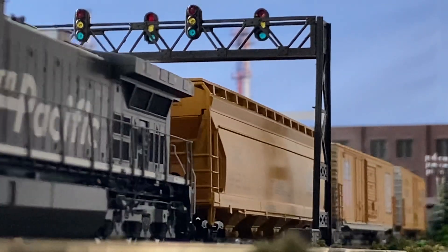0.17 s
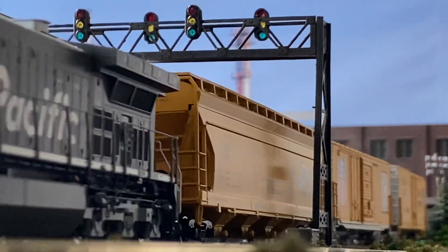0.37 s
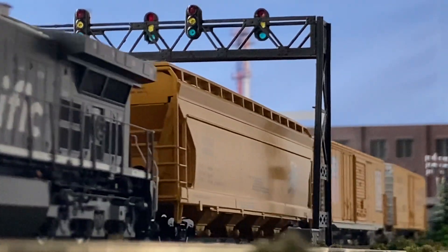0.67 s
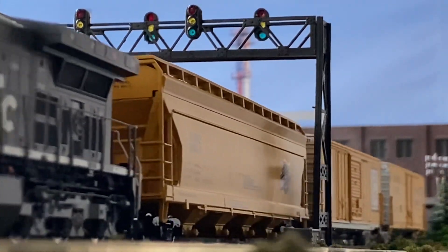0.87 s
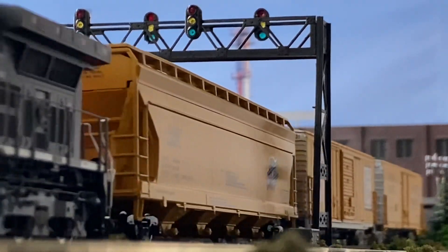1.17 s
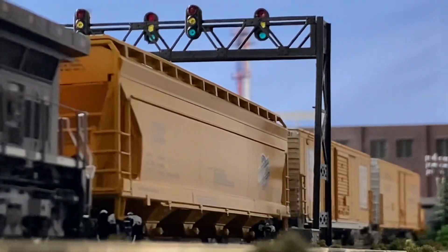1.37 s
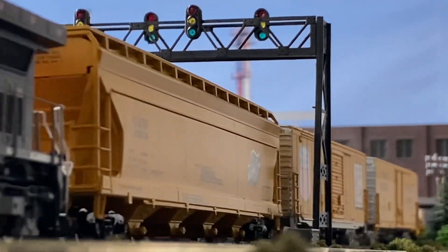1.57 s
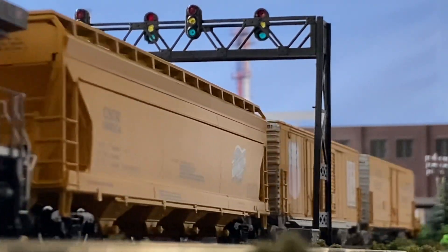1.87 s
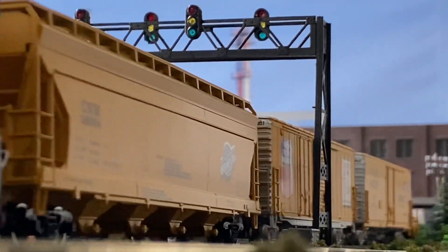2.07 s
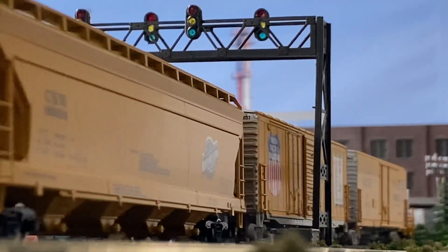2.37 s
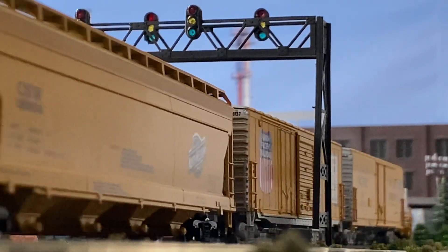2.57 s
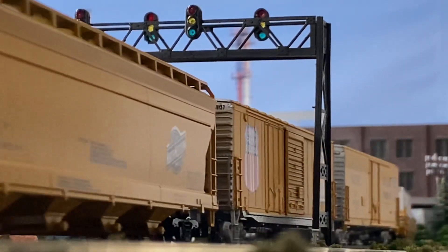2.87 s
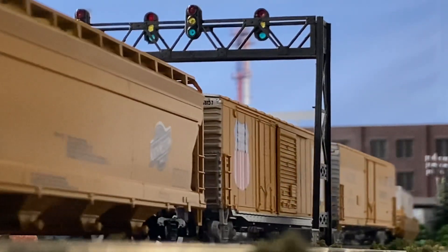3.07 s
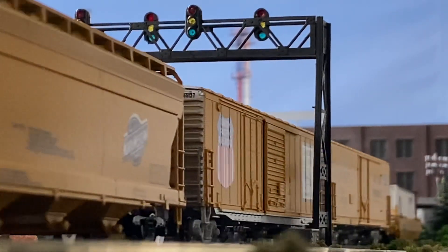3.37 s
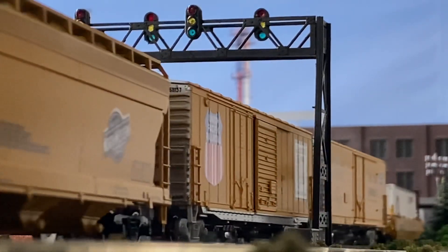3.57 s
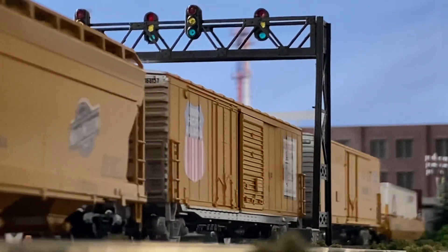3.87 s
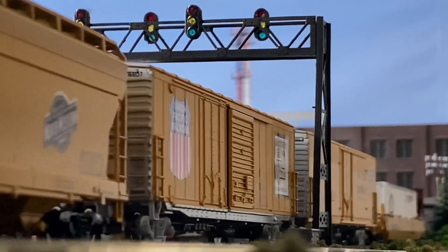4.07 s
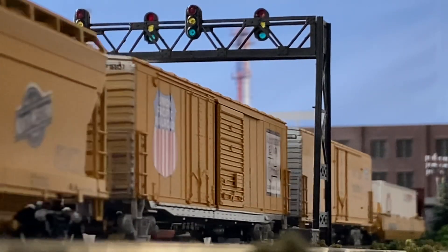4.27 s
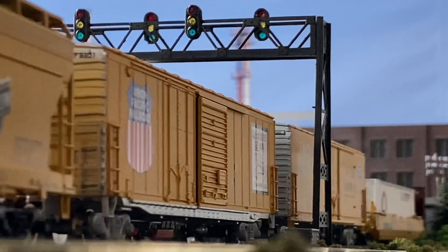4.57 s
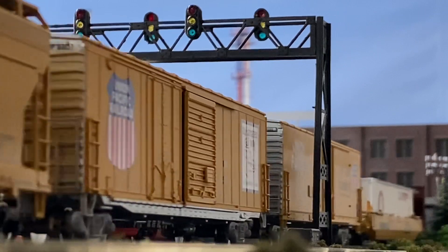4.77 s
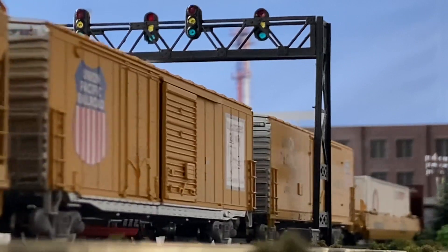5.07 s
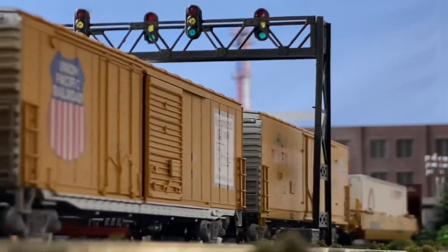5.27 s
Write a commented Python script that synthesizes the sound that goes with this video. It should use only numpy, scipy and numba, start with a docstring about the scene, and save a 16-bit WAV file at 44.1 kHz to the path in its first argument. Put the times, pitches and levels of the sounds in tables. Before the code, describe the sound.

A model freight train creeps past, heard from close beside the track. From the start, tiny wheels make a continuous, thin metallic scrape that pulses unevenly about seven times a second. The locomotive's small motor and gears drone and whirr through the baseboard, left of centre. At about 1.1 seconds a thin, high ringing tone rises from the rail, and light, sharp wheel ticks begin, coming irregularly and more often after 2 seconds. The motor drone is fullest around 2 seconds, then slowly recedes to the left. A faint low growl enters at 1.5 seconds, and a faint deeper rumble at 3 seconds. The scrape grows louder and hissier from about 3 seconds, shifting in tone as the cars move, and is strongest until about 4.7, with the clearest ticks near 4 and 4.8 seconds. It eases slightly but is still rolling at the end, around 5.4 seconds.

```python
"""Beside a model railway track, a small freight train creeps past a phone. A tiny wheel scrapes
the rail unevenly, easing off once a turn, and rings rail and car body; sharper nicks tick, the rail
sings thinly, and the colour of the scrape shifts as the cars move. On the left the locomotive's
motor and gears drone through the baseboard, over a low growl and rumble."""
import sys
import numpy as np
from scipy import signal
from scipy.fft import rfft, irfft, next_fast_len
from scipy.io import wavfile
from scipy.ndimage import uniform_filter1d
from numba import njit

SR = 44100
rng = np.random.default_rng(int(sys.argv[2]) if len(sys.argv) > 2 else 0)


def to_wav(sig):
    """Store sig (one row per channel, or 1-D mono) as 16-bit WAV at the path in sys.argv[1].

    Samples outside -1..1 are clipped; the rate is SR.
    """
    pcm = np.clip(np.atleast_2d(sig), -1, 1) * 32767
    pcm = np.round(pcm).astype(np.int16)
    wavfile.write(sys.argv[1], SR, pcm.T)  # frames by channels


N = 239771
T = np.arange(N) / SR

# time_s, lateness_s
TURN_LAG = [(0, 0.0014), (.9, -.004), (1.05, .003), (1.55, -0.0011), (2.1, 0.0015), (2.42, 0.012), (2.8, 0),
            (3.2, -.007), (3.6, -0.011), (3.78, -0.0000075), (4.1, -.007), (4.45, -0.0013), (4.85, -0.002),
            (5.3, 0.011), (5.44, 0.0043)]
# turn_fraction, pressure_db
TURN_PRESSURE = [(0, 4), (.07, 0), (.17, 5), (.33, 4.5), (.45, 2), (.6, 2), (.68, -1.5), (.74, -6),
                 (.8, -1), (.88, 3), (1, 4.5)]
# centre_s, half_length_s, gain_db
PRESSURE_SURGES = [(.94, 0.01, 2.5), (1.115, 0.009, 1.5), (1.41, 0.015, 3.5), (1.535, 0.012, 2),
                   (1.575, .006, 3), (1.62, 0.014, 2.5), (2.36, 0.015, 2), (2.48, 0.032, 2),
                   (2.77, 0.018, 1.5), (2.87, 0.037, 1), (3.02, 0.015, 1.5), (3.29, 0.025, 1.5),
                   (3.69, 0.017, 0.5), (3.965, 0.015, 2.5), (4.25, 0.015, 3), (4.36, 0.03, 2),
                   (4.47, .015, 1.5), (4.64, 0.033, 1.5), (4.77, 0.012, -0.5), (5.2, .02, 1.5),
                   (5.32, 0.019, 2)]
def wheel_scrape(turn_hz=7.378):
    """Wheel pressure on the rail cycles each turn and surges briefly; the train's speed wavers."""
    turn_fraction = (T - curve(TURN_LAG)) * turn_hz % 1
    pressure_db = np.interp(turn_fraction, *np.transpose(TURN_PRESSURE)) + 0.9 * walk(110)
    body = gliding_notches(body_rings(pressure_db))
    friction = rng.standard_normal(N) * undb(0.38 * pressure_db)
    return undb(swell(PRESSURE_SURGES)) * (body + rail_tone(pressure_db) + narrow_rings(friction))


# per band (main, low shoulder, high shoulder, valley, hiss, upper hiss, air):
# base_hz, nominal_width_hz, relative_db
BAND_MODES = [
    [(3000, 245, 6.5), (3263, 290, 0)],
    [(2632, 354, 5), (2150, 720, -5.5), (1752, 290, -4.5)],
    [(3590, 350, 7.5), (4146, 344, 0)],
    [(4835, 940, 0)],
    [(6490, 790, 0)],
    [(7930, 1020, -8), (9050, 1110, -14.5)],
    [(10800, 3600, 0), (15100, 1100, -0.5)],
]
# per band: pressure_db_per_db
BAND_FOLLOW = [0.5, 0.45, 0.6, 0.53, 0.87, 0.84, 0.9]
# time_s, level_db
MAIN_BAND_LEVEL = [(0, -37.5), (.45, -35), (.6, -37), (.91, -35), (.95, -33.5), (1.08, -32), (1.13, -31.5),
                   (1.7, -30.3), (2.1, -30.5), (2.35, -27), (2.6, -30), (2.9, -24.5), (3.3, -23.5),
                   (3.7, -24.5), (4.35, -23), (4.65, -24), (5.1, -28), (5.44, -29)]
# per band after main: base_db
SIDE_BAND_DB = [-37, -39, -43, -35.5, -40, -74.5]
# per band after main: centre_s, half_length_s, gain_db; the top band brightens briefly and faintly at 1.6 s
SIDE_BAND_SWELLS = [
    [(.2, 0.34, 0), (.95, 0.27, -2.5), (2.85, 0.13, 1.5), (3.7, 1.44, 7.5)],
    [(.8, 0.7, 1.5), (2.85, 0.2, 3.5), (4.4, 1, 11)],
    [(.3, 0.31, 2.5), (2.4, 1, 3.5), (4.4, 0.54, -7)],
    [(1.5, 0.65, 4.5), (3.0, 1, 4), (4.8, 0.88, -6.5)],
    [(.3, 1.3, 7.5), (2.9, 0.35, 3.5), (4.25, 0.75, 9.5)],
    [(1.6, 0.23, 12), (3.7, 1.9, 30.5)],
]
def body_rings(pressure_db, scatter_db=1.3):
    """Dense tiny catches of uneven size ring rail and car body."""
    catches = (rng.random(N) < .3) * undb(scatter_db * rng.exponential(size=N))
    levels_db = [curve(MAIN_BAND_LEVEL)]
    levels_db += [db + swell(rows) for db, rows in zip(SIDE_BAND_DB, SIDE_BAND_SWELLS)]
    main_ratio = glide(1.07, 1.01, .6, .4)
    hiss_ratio = glide(1.02, 1.13, 3.2, .6) + glide(0, -.1, 4.5, .4)  # sinks as the wheel leaves
    pitch_ratios = [main_ratio, 1, 1, 1, hiss_ratio, 1, 1]
    out = 0
    for modes, db, follow, ratio in zip(BAND_MODES, levels_db, BAND_FOLLOW, pitch_ratios):
        band = ring_set(catches * rng.standard_normal(N), modes, ratio)
        load = undb(follow * pressure_db + 0.9 * walk(60))
        out = out + undb(db) * unit(load * band)
    return out


# from_hz, to_hz, centre_s, half_length_s
NOTCH_GLIDES = [(3780, 1690, 0.95, 0.71), (4730, 5330, 4.3, 0.58), (7190, 9400, 3.1, 1.8)]
# width_hz, depth_fraction
NOTCH_SHAPES = [(800, .62), (330, .88), (450, .65)]
def gliding_notches(x):
    """Dark gaps glide through the scrape as the cars move."""
    for path, (width_hz, depth) in zip(NOTCH_GLIDES, NOTCH_SHAPES):
        x = x - depth * ring(x, glide(*path), width_hz)
    return x


# pitch_hz, width_hz, level_db, centre_s, half_length_s
NARROW_MODES = [(3137, 45, -37.5, 0.19, 0.45), (3950, 130, -42, .9, 0.53), (3790, 96, -37.5, 2.65, .35),
                (4390, 10, -49.5, 4.8, 4), (2621, 50, -44, 3.2, 1.5), (6340, 170, -42, 3.3, 0.63)]
def narrow_rings(friction):
    """Narrow modes of rail and car, each heard while its wheel is near."""
    return sum(undb(db) * bell(centre_s, half_s) * unit(ring(friction, hz, width_hz))
               for hz, width_hz, db, centre_s, half_s in NARROW_MODES)


# pitch_hz, wander_hz, relative_db, left_db
RAIL_TONE = [(2984, 3.5, 0, 0)]
# time_s, base_db
RAIL_TONE_LEVEL = [(0, -62), (1.0, -58), (1.15, -38), (1.9, -37), (2.2, -41), (2.5, -38), (3.2, -40),
                   (3.5, -33), (4.4, -31), (4.8, -35), (5.44, -39)]
def rail_tone(pressure_db):
    """The rail sings one thin tone, louder under pressure."""
    return undb(curve(RAIL_TONE_LEVEL) + 0.4 * pressure_db) * tones(RAIL_TONE, waver_db=2.5)[0]


# start_s, peak_db
WHEEL_NICKS = [(1.112, -16.5), (1.7619, -15), (1.9275, -15.5), (2.162, -15), (2.3058, -18), (2.364, -14.5),
               (2.7128, -13), (2.9237, -16), (3.0006, -17), (3.1422, -15), (3.2343, -15), (3.2743, -12),
               (3.2987, -13), (3.5446, -13), (3.84, -12), (3.9555, -7), (4.148, -10), (4.3366, -15),
               (4.6072, -12), (4.7703, -9.5), (4.9611, -16), (5.001, -15), (5.1094, -18), (5.1483, -16),
               (5.2073, -15), (5.2346, -15), (5.322, -16), (5.4078, -18)]
def wheel_nicks(pitch_hz=3039.3, nominal_width_hz=270):
    """Single larger catches, each ringing briefly."""
    impulses = np.zeros(N)
    for start_s, peak_db in WHEEL_NICKS:
        impulses[int(start_s * SR)] = undb(peak_db)
    ticks = ring_set(impulses, [(pitch_hz, nominal_width_hz, 0)])
    return ticks * impulses.max() / np.abs(ticks).max()


# freq_hz, relative_db
BOARD_SPECTRUM = [(250, -39.5), (340, -14), (400, -7), (470, -12), (515, -5.5), (760, -1.5), (1050, 0.5),
                  (1260, -4.5), (1400, -25), (1700, -34)]
# pitch_hz, wander_hz, relative_db, left_db
DRONE_TONES = [(771, 7.96, -14.5, -0.5), (956, 3, -15, 5), (1048, 9.08, -17.5, 5.5), (1075, 5.93, -16, 4)]
def baseboard_drone(gain_db=-33.5, nearest_s=1.9, passing_s=2.35):
    """Motor and gears shake the board; the drone fills in, then spreads and draws off to the left."""
    nearness = 1 / np.hypot(1, (T - nearest_s) / passing_s)
    coherence = glide(0.85, -0.15, 3.5, 1.5)
    low_cut = glide(0.37, 0, 2, 0.5)
    noise = coloured(BOARD_SPECTRUM, coherence)
    board = np.array([side - low_cut * ring(side, hz=530, width_hz=360) for side in noise])
    drone = board + tones(DRONE_TONES) * [np.ones(N), coherence]
    return undb(gain_db) * nearness * panned(drone, glide(2.4, 7.6, 1.5, 1.1))


# freq_hz, relative_db
WHIRR_SPECTRUM = [(1100, -24.5), (1330, 4), (1560, 7), (1700, 1), (2000, 0.5), (2200, -20), (2600, -50)]
# pitch_hz, wander_hz, relative_db, left_db
GEAR_WHINES = [(1230.5, 2, -3.5, 6.5), (1412, 3, -18, 12), (1536, 2, -11.5, 8), (1558, 2, -13, 8)]
# pitch_hz, wander_hz, relative_db, left_db
ANTIPHASE_WHINE = [(1466, 1.5, -13, 6)]
def gear_whirr(gain_db=-41, fade_db_per_s=1.25):
    """Gears whirr and whine, slowly fading; one whine reaches left and right in opposite phase."""
    whirr = panned(coloured(WHIRR_SPECTRUM, coherence=0.25), left_db=1)
    whirr += tones(GEAR_WHINES, waver_db=3.0)
    whirr += tones(ANTIPHASE_WHINE, waver_db=1.5) * [[1], [-1]]
    return undb(gain_db - fade_db_per_s * T) * whirr


# pitch_hz, wander_hz, relative_db, left_db
HUM_TONES = [(384.7, 1.21, 1, 5.5), (346, 4.8, -13, -2)]
def motor_hum(gain_db=-53.5):
    """Two low motor and gear tones that swell twice."""
    swell_db = 4.1 * bell(.9, 0.25) + 5.9 * bell(2.9, 1.16)
    return undb(gain_db + swell_db) * tones(HUM_TONES, waver_db=-0.7)


# freq_hz, relative_db
GROWL_SPECTRUM = [(110, -30), (140, -8), (200, 0.5), (300, 6.5), (400, -30)]
# freq_hz, relative_db
RUMBLE_SPECTRUM = [(15, -70), (30, -31), (60, -7), (95, -0.5), (135, -5), (200, -11)]
def board_rumble():
    """A growl, then a deeper rumble, come up as the train's weight reaches the near board."""
    growl = coloured(GROWL_SPECTRUM, coherence=glide(.92, .5, 3.8, .8))
    growl = panned(growl, left_db=glide(2, 6.5, 2.5, 1.5))
    rumble = coloured(RUMBLE_SPECTRUM, coherence=.95)
    return undb(glide(-71.5, -59.5, 1.5, 0.1)) * growl + undb(glide(-75, -62.5, 3, 0.2)) * rumble


def tones(table, waver_db=3.5):
    """Stereo sines wavering in pitch and level."""
    out = 0
    for hz, wander_hz, db, left_db in table:
        cycles = rng.random() + np.cumsum(hz + wander_hz * walk(10)) / SR
        tone = np.sqrt(2) * np.sin(2 * np.pi * cycles)
        out = out + panned(undb(db + waver_db * walk(7)) * tone, left_db)
    return out


def coloured(spectrum, coherence):
    """Shaped stereo noise, left and right partly alike."""
    hz, db = np.transpose(spectrum)
    size = next_fast_len(N)
    bins_hz = np.fft.rfftfreq(size, 1 / SR)
    gain = undb(np.interp(np.log(bins_hz + 1), np.log(hz), db, right=-80))
    shared, own = (unit(irfft(rfft(rng.standard_normal(size)) * gain, size)[:N]) for _ in range(2))
    return np.array([shared, coherence * shared + np.sqrt(1 - coherence ** 2) * own])


def ring_set(x, modes, pitch_ratio=1):
    """Parallel two-stage resonances of alternating sign."""
    out = 0
    for i, (hz, width_hz, db) in enumerate(modes):
        stage = hz * pitch_ratio, 1.76 * width_hz
        out = out + (-1) ** i * undb(db) * ring(ring(x, *stage), *stage)
    return out


def ring(x, hz, width_hz):
    """One resonance, steady or gliding."""
    hz = hz + np.zeros(N)
    return svf(x, np.tan(np.pi * hz / SR), width_hz / hz)


@njit
def svf(x, tuning, damping):
    """State-variable band-pass, unity gain at centre."""
    y, band, low = np.empty(len(x)), 0., 0.
    for i in range(len(x)):
        g = tuning[i]
        v = (band + g * (x[i] - low)) / (1 + g * (g + damping[i]))
        band, low = 2 * v - band, low + 2 * g * v
        y[i] = damping[i] * v
    return y


def walk(rate_hz):
    """Random levels joined by ramps."""
    hold = int(SR / rate_hz)
    steps = np.repeat(rng.standard_normal(N // hold + 1), hold)
    return 0.993 * uniform_filter1d(steps, hold)[:N]


def curve(table):
    """Straight lines between timed values."""
    return np.interp(T, *np.transpose(table))


def bell(centre_s, half_s):
    """Gaussian window, peak 1."""
    return np.exp(-((T - centre_s) / half_s) ** 2)


def swell(rows):
    """Summed rises and dips in dB."""
    return sum(db * bell(centre_s, half_s) for centre_s, half_s, db in rows)


def glide(start, end, centre_s, half_s):
    """Smooth step from start to end."""
    return start + (end - start) * (1 + np.tanh((T - centre_s) / half_s)) / 2


def panned(x, left_db):
    """Set left above right by left_db."""
    return x * undb(left_db * np.array([[.5], [-.5]]))


def undb(db):
    """Decibels to gain."""
    return 10 ** (np.asarray(db) / 20)


def unit(x):
    """Scale to rms 1."""
    return x / np.sqrt(np.mean(x ** 2))


# freq_hz, left_lead_rad
STEREO_PHASE = [(2750, 0), (2900, -.38), (3350, -.35), (3550, 0), (7250, 0), (7600, .45), (7750, 1.1),
                (9000, 3.1), (10200, 4.9), (10450, 6.05), (11000, 2 * np.pi), (11650, 2 * np.pi),
                (12500, 3 * np.pi), (14000, 3 * np.pi), (14600, 4 * np.pi)]
def widen_treble(x):
    """A left-right phase shift, stepped by frequency, widens the scrape's treble."""
    size = next_fast_len(N)
    lead_rad = np.interp(np.fft.rfftfreq(size, 1 / SR), *np.transpose(STEREO_PHASE))
    return irfft(rfft(x, size) * np.exp(.5j * np.array([lead_rad, -lead_rad])), size)[:, :N]


def scene():
    """The wheel close by, the locomotive spread to the left."""
    wheel = widen_treble(wheel_scrape() + wheel_nicks())
    return wheel + baseboard_drone() + gear_whirr() + motor_hum() + board_rumble()


def record(dry, dull_hz=9800, top_hz=15800):
    """The microphone dulls the highest treble and the phone cuts the top."""
    dull = signal.sosfilt(signal.butter(2, dull_hz, fs=SR, output="sos"), dry)
    return signal.sosfilt(signal.ellip(8, .2, 70, top_hz, fs=SR, output="sos"), dull)


dry = scene()
out = record(dry)
to_wav(out)
```